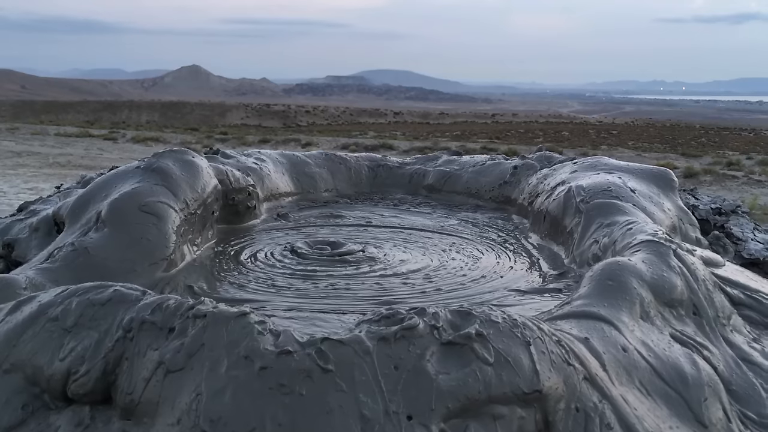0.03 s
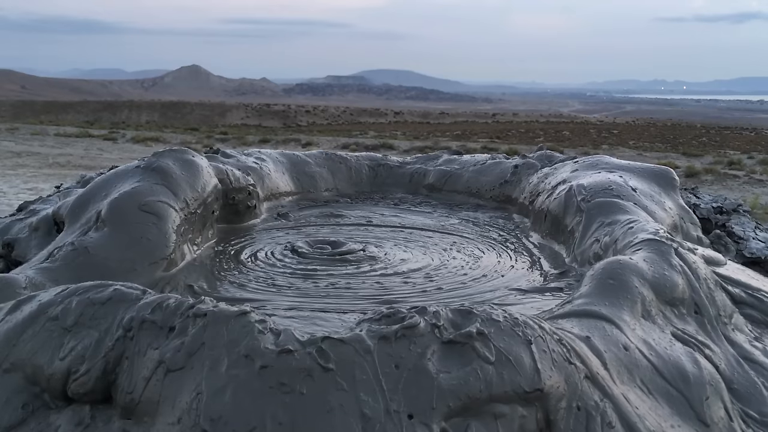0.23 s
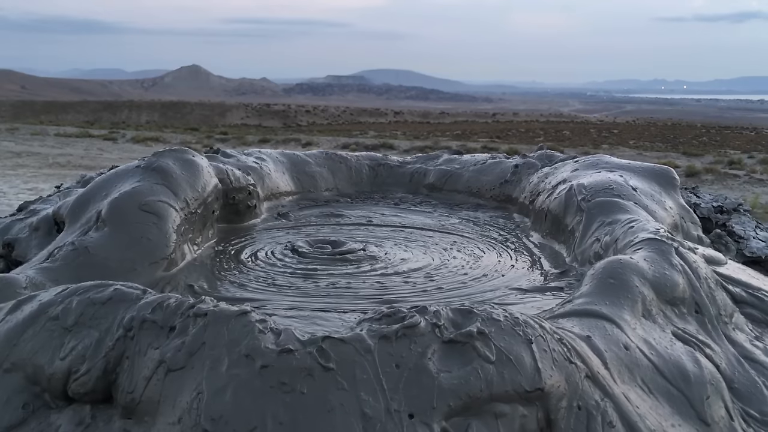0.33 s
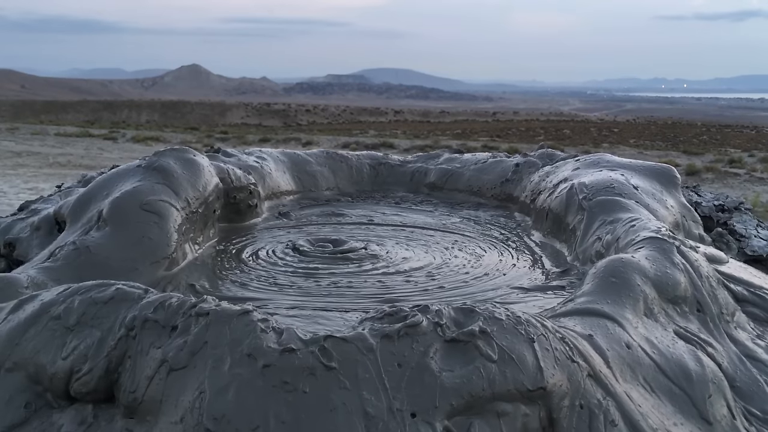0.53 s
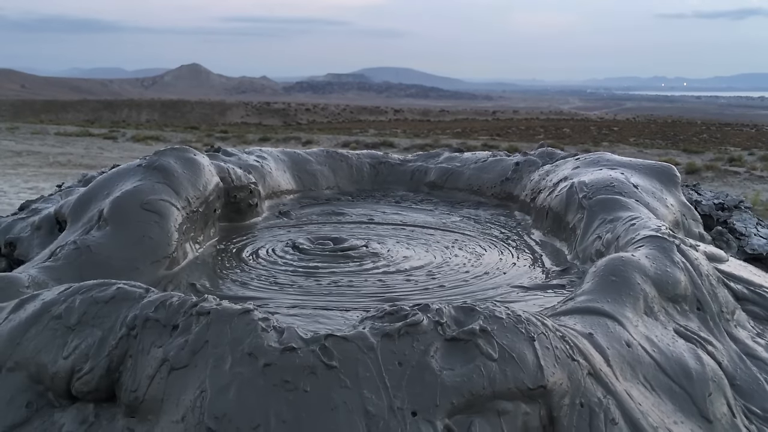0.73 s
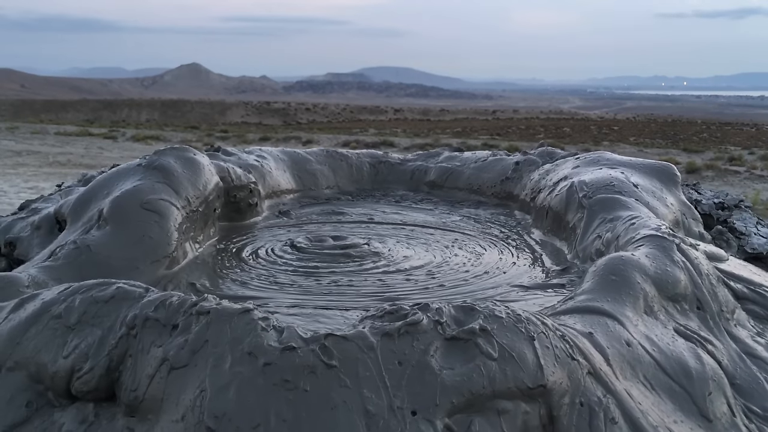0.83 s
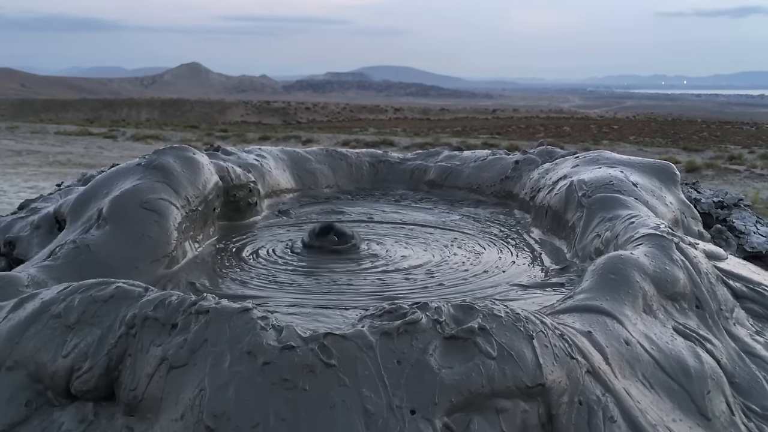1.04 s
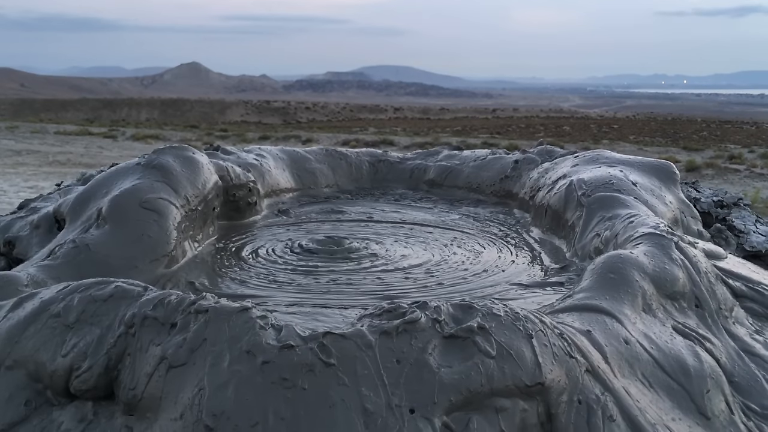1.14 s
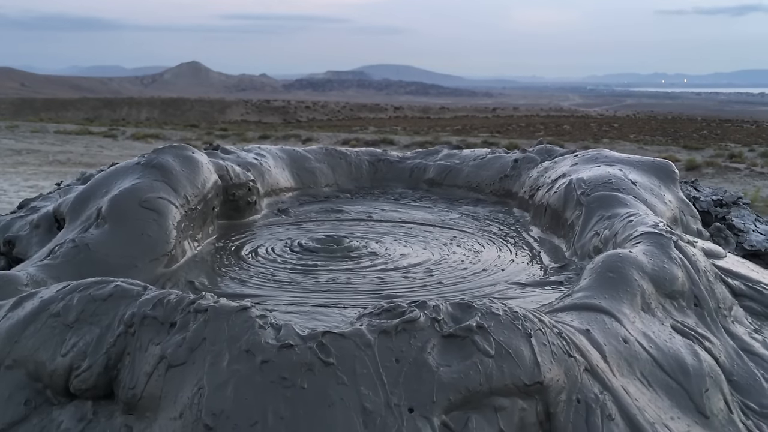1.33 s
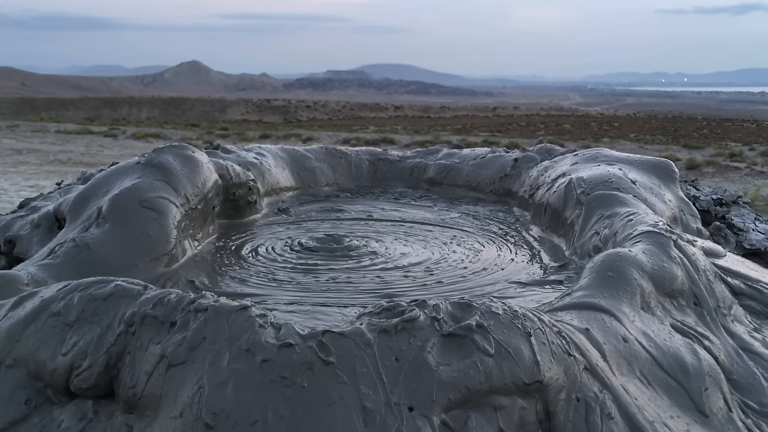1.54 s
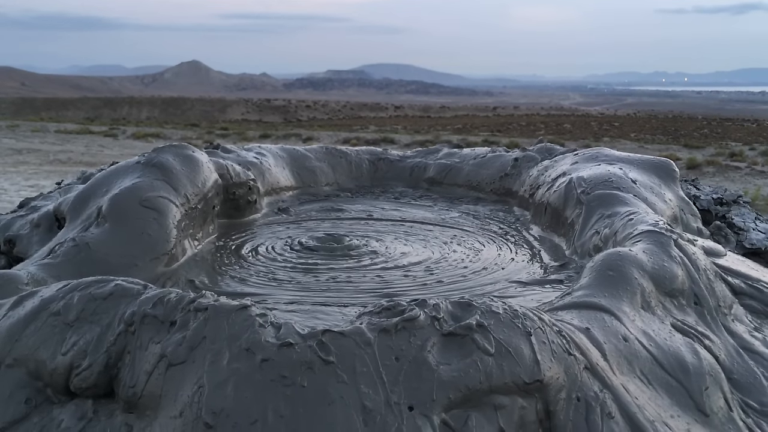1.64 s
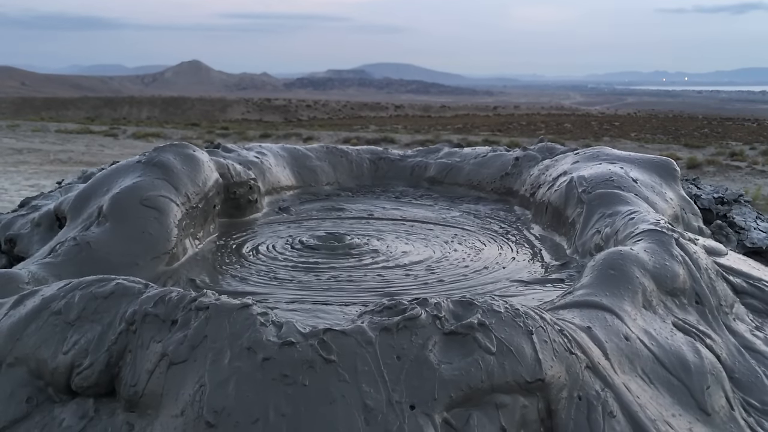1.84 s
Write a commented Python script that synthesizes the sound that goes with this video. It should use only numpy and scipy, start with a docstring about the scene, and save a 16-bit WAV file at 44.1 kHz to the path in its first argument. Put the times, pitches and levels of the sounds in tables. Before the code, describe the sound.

Thick mud bubbling: a quick run of deep glugs, then one more heavy, dull gulp

```python
"""A small crater on an open plain, holding a pool of thick bubbling mud.
Light wind, a faint far hiss and dull churning noise lie under a run of deep, nearly dead glugs:
short sines sagging in pitch. Resonant grains make the skin's fizz and the gas's sputter; short
noise puffs make wet spits, brief rising sines make plops. One more heavy gulp follows.
"""
import sys
import numpy as np
from scipy import signal
from scipy.fft import rfft, irfft
from scipy.io import wavfile

SR = 44100
rng = np.random.default_rng(int(sys.argv[2]) if len(sys.argv) > 2 else 0)


def wav_out(sig):
    """Save sig, one row per channel (or a flat mono array), as 16-bit PCM at SR to the path in sys.argv[1]."""
    wavfile.write(sys.argv[1], SR, np.round(np.clip(np.atleast_2d(sig).T, -1, 1) * 32767).astype(np.int16))


N = 83790
TIME_S = np.arange(N) / SR


def from_db(db):
    """Decibels to gain."""
    return 10 ** (np.asarray(db) / 20)


def rms_one(x):
    """Scale to unit rms."""
    return x / np.sqrt(np.mean(x ** 2) + 1e-20)


def level(points):
    """Gain over time, interpolated in dB between (time [s], level [dB]) points."""
    time_s, level_db = np.transpose(points)
    return from_db(np.interp(TIME_S, time_s, level_db))


def noise(spectrum):
    """Unit-rms Gaussian noise, coloured by the spectrum and rolled off beyond both ends."""
    hz, db = np.transpose(spectrum)
    f = np.maximum(np.arange(N // 2 + 1) * SR / N, 1)
    gain = from_db(np.interp(np.log(f), np.log(hz), db))
    gain /= 1 + (f / hz[-1] / 1.2) ** 8
    gain /= 1 + (hz[0] / f / 2) ** 2
    return rms_one(irfft(rfft(rng.standard_normal(N)) * gain, N))


def band(x, hz, octaves):
    """Band-pass around a centre."""
    half_width = 2 ** (octaves / 2)
    edges_hz = np.clip([hz / half_width, hz * half_width], 10, .48 * SR)
    return signal.sosfilt(signal.butter(2, edges_hz, "band", fs=SR, output="sos"), x)


def burst(t, attack_s, decay_s):
    """Quick swell and exponential decay."""
    t = np.maximum(t, 0)
    return (1 - np.exp(-(t / attack_s) ** 2)) * np.exp(-t / decay_s)


def grains(modes, per_s, spread_db, ring_cycles):
    """Random clicks striking two-pole resonators, one per mode; sum at unit rms."""
    out = np.zeros(N)
    for hz, db in modes:
        born = rng.random(N) < per_s / len(modes) / SR
        size = from_db(spread_db * np.minimum(rng.exponential(1, N), 3))
        clicks = born * size * rng.choice([-1, 1], N)
        radius = np.exp(-np.log(1000) * hz / ring_cycles / SR)  # -60 dB after ring_cycles
        angle = 2 * np.pi * hz / SR
        poles = [1, -2 * radius * np.cos(angle), radius * radius]
        ringing = signal.lfilter([1, 0, -1], poles, clicks + 1e-18)
        out += from_db(db) * rms_one(ringing)
    return rms_one(out)


# wind colour: (frequency [Hz], relative density [dB per Hz])
WIND_SPECTRUM = [(24, -21.5), (45, 9.5), (70, 4), (108, 2), (170, -4), (270, -9.5), (370, -10.5),
                 (500, -18), (700, -22)]
# far air and hiss colour: (frequency [Hz], relative density [dB per Hz])
AIR_SPECTRUM = [(300, -50), (600, -1), (900, 4), (1200, -2.5), (1600, -17), (2000, -19), (3000, -15.5),
                (4500, -17.5), (5400, -16.5), (7500, -17.5), (9300, -15), (10400, -18), (11800, -12),
                (15500, -10.5)]
WIND_DB, WIND_GUST_RMS_DB, AIR_DB = -55.5, 2.14, -68


def open_air():
    """Light wind, its level wandering with slow noise, over a steady far hiss."""
    gusts = noise([(2, 0), (8, -6)])
    wind = from_db(WIND_DB + WIND_GUST_RMS_DB * gusts) * noise(WIND_SPECTRUM)
    return wind + from_db(AIR_DB) * noise(AIR_SPECTRUM)


# churning under the glugs: (time [s], level [dB])
CHURN_LEVEL = [(0, -67), (.13, -50), (.29, -57), (.36, -56), (.44, -38.5), (.50, -47.5), (.62, -38.5),
               (.70, -50), (.80, -61), (1.05, -64.5), (1.35, -59), (1.43, -40.5), (1.50, -57.5),
               (1.72, -54), (1.9, -58.5)]
# churn colour: (frequency [Hz], relative density [dB per Hz])
CHURN_SPECTRUM = [(25, -14.5), (50, 14.5), (120, 1.5), (250, -13.5), (400, -19.5), (600, -50.5),
                  (1000, -49), (3000, -95)]


def churn():
    """Dull rumble of mud displaced by the rising gas."""
    return level(CHURN_LEVEL) * noise(CHURN_SPECTRUM)


# gas pockets shifting under the mud: (time near peak [s], level [dB], pitch at that time [Hz],
# ring [cycles], pitch sag [share])
GLUGS = [(0.0509, -48, 116.4, 1.3, 0.031), (0.1201, -36, 208, 0.84, 0.054), (0.1465, -34, 133, 0.35, 1),
         (0.1637, -35.5, 53, 1.2, 0.11), (0.1998, -31, 60.5, 0.19, 0.72), (0.2093, -36.0, 260, 0.93, 0.28),
         (0.228, -41.5, 232, 1.1, 0.1), (0.241, -26.5, 66.6, 0.12, 0.32), (0.2699, -28.5, 235, 1.05, 0.41),
         (0.286, -31.5, 57, 0.32, 0.058), (0.3276, -32.5, 113, 1.6, 0.33), (0.3449, -43.5, 240, 1.6, 0.05),
         (0.3774, -35.5, 72.5, 0.88, 0.084), (0.4005, -29, 198, 0.82, 0.48), (0.4193, -29, 85.4, 1.5, 0.05),
         (0.4247, -31.7, 240, 1.4, 0.4), (0.4396, -41.5, 279, 2.3, 0.058), (0.4558, -32, 290, 0.76, 0.3),
         (0.4589, -26, 91, 0.57, 0.18), (0.4981, -32.5, 163, 1.5, 0.52), (0.5203, -33, 220, 0.73, 0.49),
         (0.5311, -30.5, 202, 2.6, 0.63), (0.553, -30.5, 164, 2, 0.24), (0.5668, -23.8, 94, 0.51, 0.88),
         (0.5993, -22.5, 84.5, 1.7, 0.55), (0.61, -26.5, 183, 1.2, 0.13), (0.6247, -13.5, 247, 1.2, 0.41),
         (0.6394, -21.5, 51.6, 0.26, 0.071), (0.6637, -21, 312, 1.18, 0.46), (0.6778, -24.5, 65, 0.2, 0.05),
         (0.6985, -44, 430, 1.0, 0.45), (0.7007, -33, 181, 0.79, 0.79), (0.7146, -31.5, 160, 2.2, 0.75),
         (0.7435, -28.5, 77, 0.63, 0.38), (0.776, -37, 93, 0.55, 0.046), (0.825, -46.5, 108, 2.4, 0.039),
         (0.8668, -36.3, 63.6, 0.49, 0.054), (0.8844, -42, 109, 1.9, 0.21), (0.9418, -31, 59.5, 0.25, 0.34),
         (1.0082, -38, 58, 0.31, 0.064), (1.1848, -40.5, 42, 0.36, 0.59), (1.4058, -24, 52.4, 0.29, 0.42),
         (1.411, -37, 229, 2.7, 0.13), (1.413, -22.5, 103.7, 0.7, 0.18), (1.4267, -23.5, 57.5, 0.44, 0.52),
         (1.439, -39.5, 187, 0.63, 0.15), (1.6893, -37, 49.6, 0.74, 0.05), (1.6988, -38, 165, 1.1, 0.077),
         (1.7807, -46.5, 173.6, 3.4, 0.045)]
GLUG_SWELL_CYCLES, GLUG_SAG_CYCLES, GLUG_HIGHPASS_HZ = 0.19, 0.55, 30.6


def glugs():
    """Each gas pocket swells, rings briefly in the viscous mud and sags in pitch."""
    out = np.zeros(N)
    for s, db, hz, ring_cycles, sag in GLUGS:
        near = np.abs(TIME_S - s) < 20 / hz
        cycles = (TIME_S[near] - s) * hz
        envelope = 1 / (np.exp(-cycles / GLUG_SWELL_CYCLES) + np.exp(cycles / ring_cycles))
        # pitch glides from (1 + sag) to (1 - sag) times hz
        turns = cycles - sag * GLUG_SAG_CYCLES * np.log(np.cosh(cycles / GLUG_SAG_CYCLES))
        out[near] -= from_db(db) * envelope / envelope.max() * np.sin(2 * np.pi * turns)
    highpass = signal.butter(2, GLUG_HIGHPASS_HZ, "high", fs=SR, output="sos")
    return signal.sosfilt(highpass, out + 1e-18)


# crackle of the stretched skin: (time [s], level [dB])
FIZZ_LEVEL = [(.10, -82), (.53, -80), (.60, -77), (.69, -73), (.73, -78), (.85, -74.5), (.93, -80.5),
              (1.07, -75), (1.22, -76.5), (1.35, -80.5), (1.9, -80.5)]
# fizz resonances: (frequency [Hz], relative level [dB])
FIZZ_MODES = [(1520, 3), (2000, -10.5), (2400, -3.5), (2720, -5.5)]
FIZZ_PER_S, FIZZ_SPREAD_DB, FIZZ_RING_CYCLES = 680, 3, 18


def fizz():
    """Pinhead bubbles burst at random in the stretched skin."""
    return level(FIZZ_LEVEL) * grains(FIZZ_MODES, FIZZ_PER_S, FIZZ_SPREAD_DB, FIZZ_RING_CYCLES)


# gas sputtering around the strongest glugs: (time [s], level before low-pass [dB])
SPUTTER_LEVEL = [(.47, -83), (.55, -72), (.595, -58.5), (.63, -64.5), (.65, -89), (.668, -60.5),
                 (.705, -76), (.75, -95)]
# sputter resonances: (frequency [Hz], relative level [dB])
SPUTTER_MODES = [(640, 9), (900, 8), (1230, 8.5), (1480, 1), (1720, -9.5), (2400, -11)]
SPUTTER_PER_S, SPUTTER_SPREAD_DB, SPUTTER_RING_CYCLES = 1200, 0, 8.7
SPUTTER_LOWPASS_HZ = 2670


def sputter():
    """Escaping gas pops through the wet skin in a dense, muffled crackle."""
    pops = grains(SPUTTER_MODES, SPUTTER_PER_S, SPUTTER_SPREAD_DB, SPUTTER_RING_CYCLES)
    lowpass = signal.butter(4, SPUTTER_LOWPASS_HZ, fs=SR, output="sos")
    return level(SPUTTER_LEVEL) * signal.sosfilt(lowpass, pops)


# tearing film and falling droplets: (onset [s], level before envelope [dB], centre [Hz],
# width [octaves], decay [s])
SPITS = [(0.557, -56.5, 1500, 0.27, 0.0021), (.609, -67, 2070, 0.82, 0.0013),
         (0.633, -74, 1980, 0.55, 0.001), (0.682, -68, 2400, 0.13, 0.0068),
         (0.705, -66.5, 3700, 0.63, 0.0033), (0.794, -61.5, 2200, 0.5, 0.0025),
         (0.817, -62, 3570, 0.33, 0.0018), (.845, -63.5, 5240, 0.69, 0.005), (.861, -56, 5750, 1.8, 0.0013),
         (0.861, -60, 13100, 0.41, 0.0023), (.985, -59, 2570, 1.1, 0.0012),
         (1.011, -59.5, 2600, 0.61, 0.0018), (1.053, -68, 4040, 1.3, 0.006),
         (1.071, -57.5, 2550, 0.86, 0.0021), (1.075, -52, 1240, 0.97, 0.0056),
         (1.081, -64, 5350, 0.43, 0.0022), (1.124, -65, 9800, 0.91, 0.0063),
         (1.135, -47.5, 3930, 0.37, 0.0008), (1.138, -46.5, 2620, 0.26, 0.0013),
         (1.139, -51, 6400, 1.3, 0.00069), (1.148, -45.5, 5500, 0.4, 0.00098),
         (1.148, -50, 8900, 2.1, 0.00087), (1.186, -64, 2800, 1, 0.0052),
         (1.2967, -33.5, 12300, 0.37, 0.0005), (1.2995, -44, 13800, 0.37, 0.0019)]
SPIT_ATTACK_S = 0.00031


def spits():
    """Each spit is a tiny puff of spray: a noise burst with its own pitch and width."""
    out, size = np.zeros(N), SR // 16
    for s, db, hz, octaves, decay_s in SPITS:
        envelope = burst(TIME_S[:size], SPIT_ATTACK_S, decay_s)
        puff = band(rng.standard_normal(size) * envelope, hz, octaves)
        envelope_rms = np.sqrt(np.mean(envelope ** 2))
        start = int(s * SR)
        out[start:start + size] += from_db(db) * rms_one(puff) * envelope_rms
    return out


# small surface blisters opening: (onset [s], level before envelope [dB], starting pitch [Hz],
# decay [s])
PLOPS = [(0.665, -50, 1470, 0.0037), (.744, -60, 2600, 0.0035), (.794, -46, 874, 0.0035),
         (.818, -55.5, 2490, 0.0023), (.844, -57, 2530, 0.0033), (.881, -50, 910, .004),
         (.972, -48.5, 880, 0.0026), (1.057, -42.5, 970, 0.0041), (1.076, -67, 1560, 0.01),
         (1.073, -45.5, 637, 0.003), (1.139, -40.5, 2010, 0.002), (1.226, -49, 890, 0.0044),
         (1.425, -51, 950, 0.0067), (1.685, -52.5, 820, 0.0053)]
PLOP_ATTACK_S, PLOP_RISE_PER_S = 0.0007, 1.3  # rise: share of starting pitch


def plops():
    """A blister's cavity rings briefly, rising as its mouth widens."""
    out = np.zeros(N)
    for s, db, hz, decay_s in PLOPS:
        t = np.maximum(TIME_S - s, 0)
        turns = hz * t * (1 + PLOP_RISE_PER_S * t / 2)
        out += from_db(db) * burst(t, PLOP_ATTACK_S, decay_s) * np.sin(2 * np.pi * turns)
    return out


def scene():
    """The mud pool, dry, in the open air; one channel."""
    mud = churn() + glugs() + fizz() + sputter() + spits() + plops()
    return (open_air() + mud)[None]


def record(dry):
    """Cut the deepest bass and, steeply, the top."""
    highpass = signal.butter(2, 22, "high", fs=SR, output="sos")
    lowpass = signal.ellip(10, .1, 70, 15850, fs=SR, output="sos")  # ripple dB, stop dB, cutoff Hz
    return signal.sosfilt(lowpass, signal.sosfilt(highpass, dry))


dry = scene()
out = record(dry)
wav_out(out)
```